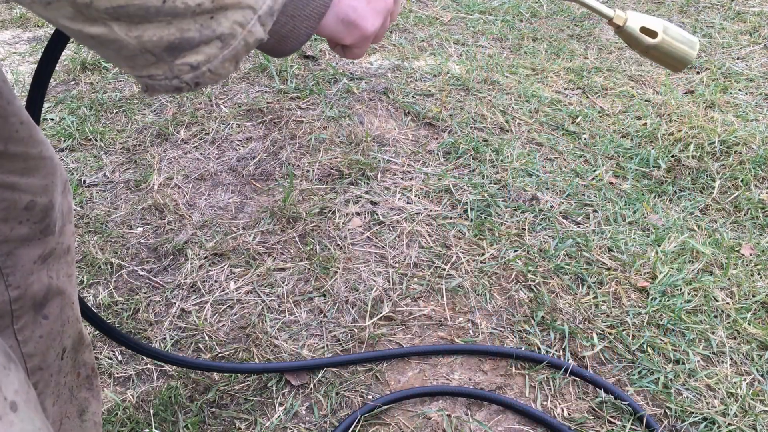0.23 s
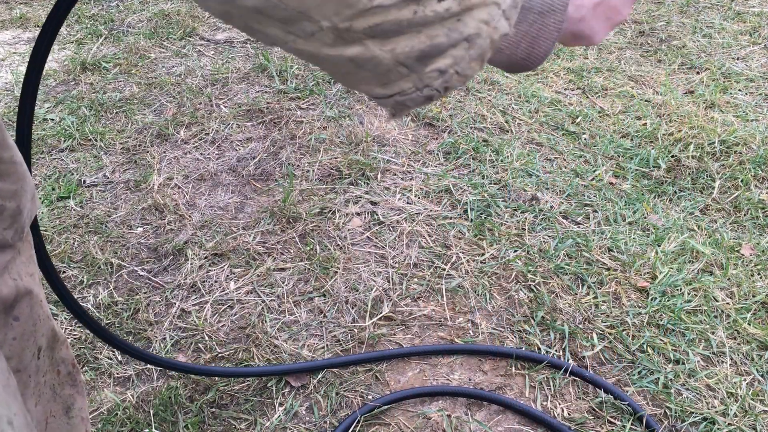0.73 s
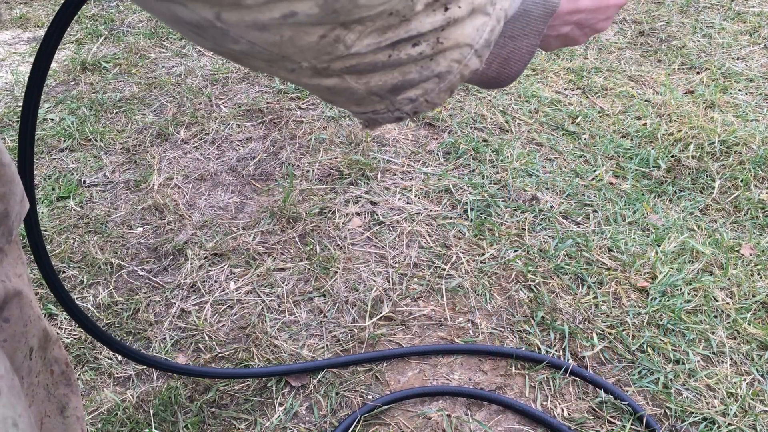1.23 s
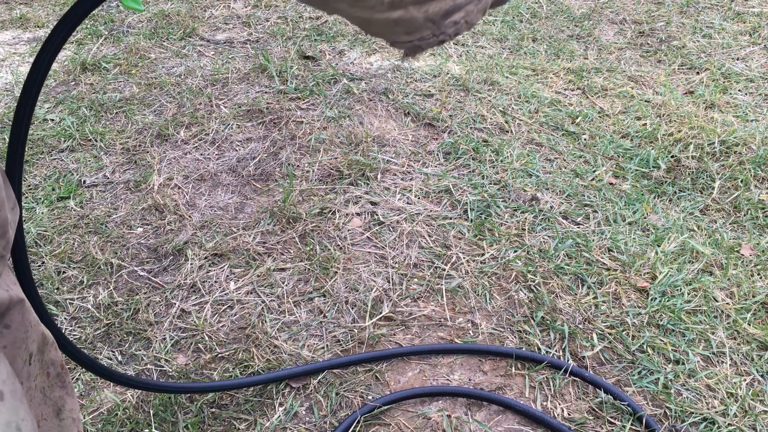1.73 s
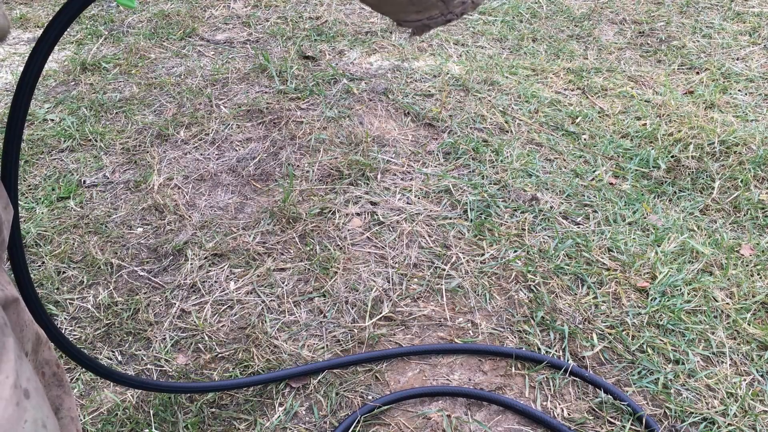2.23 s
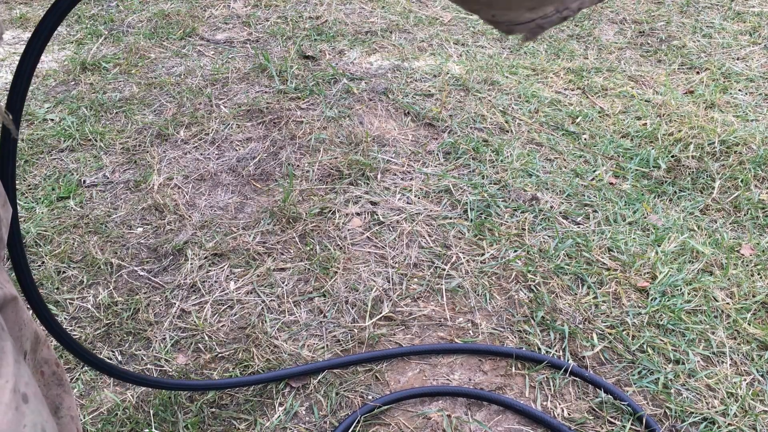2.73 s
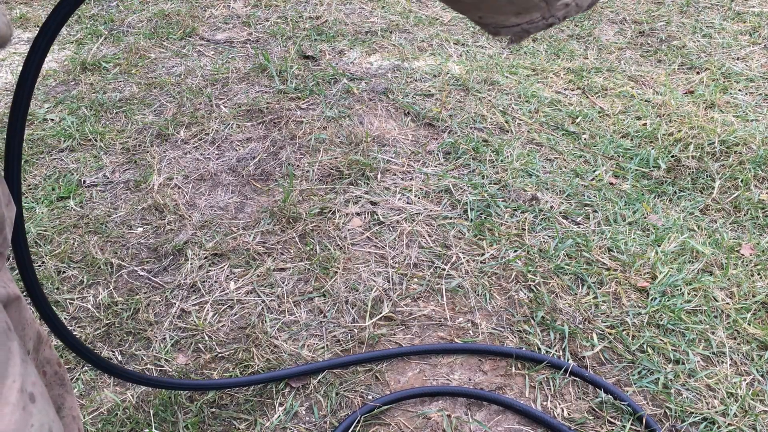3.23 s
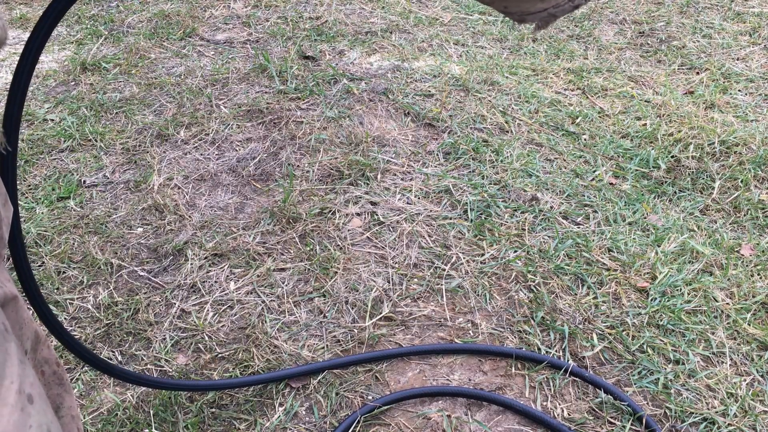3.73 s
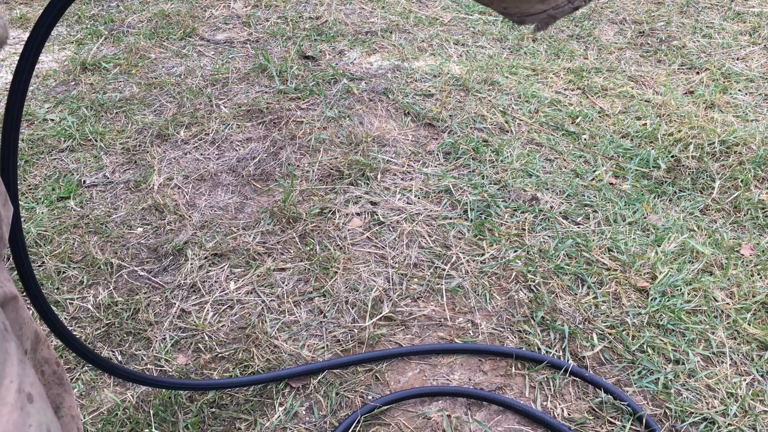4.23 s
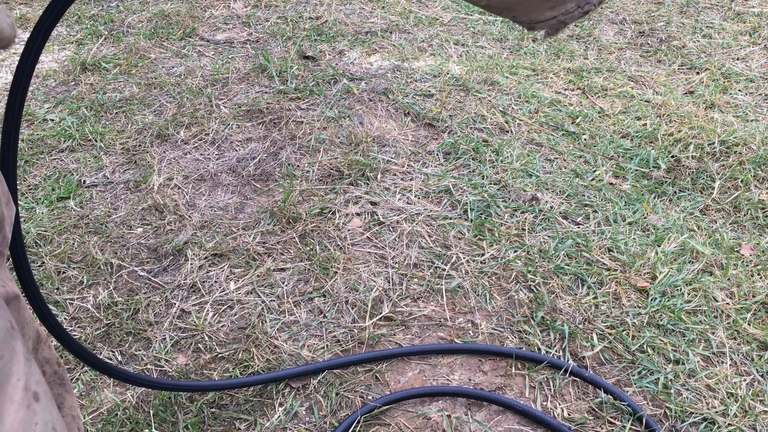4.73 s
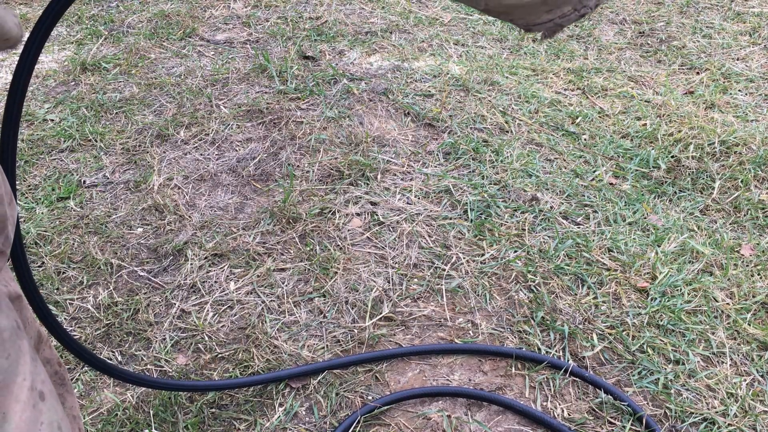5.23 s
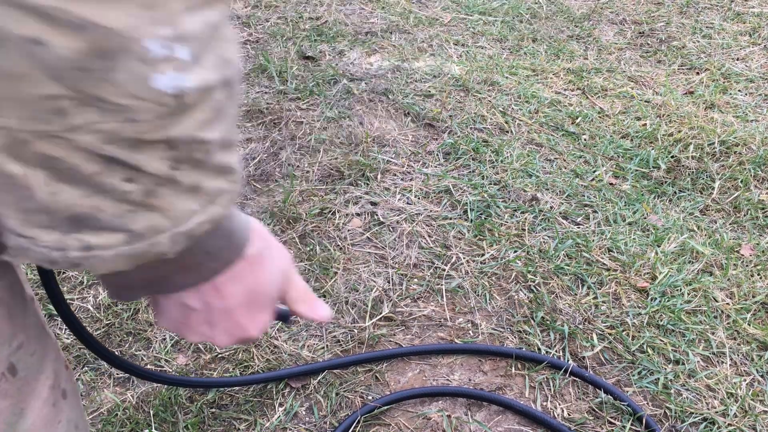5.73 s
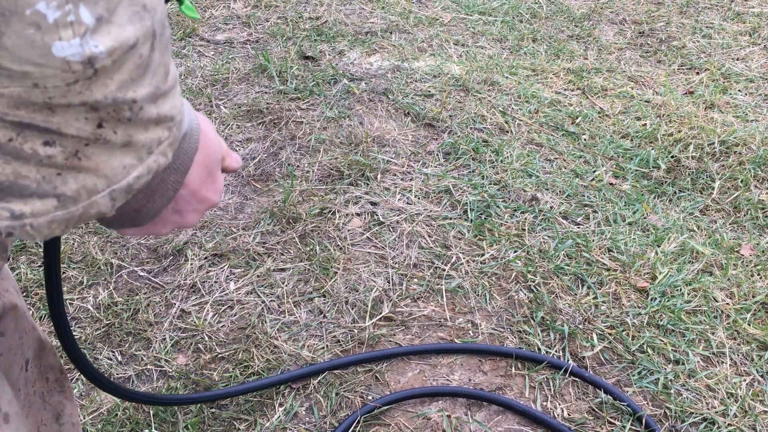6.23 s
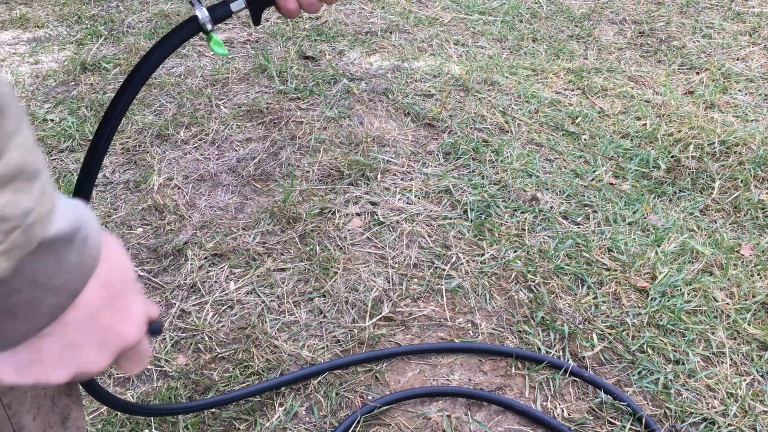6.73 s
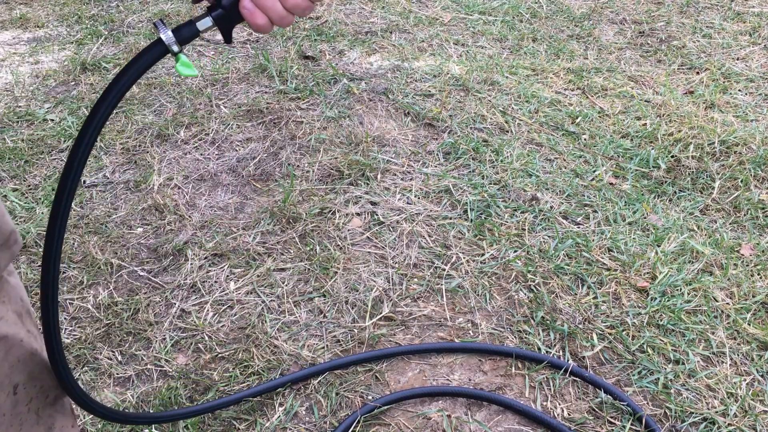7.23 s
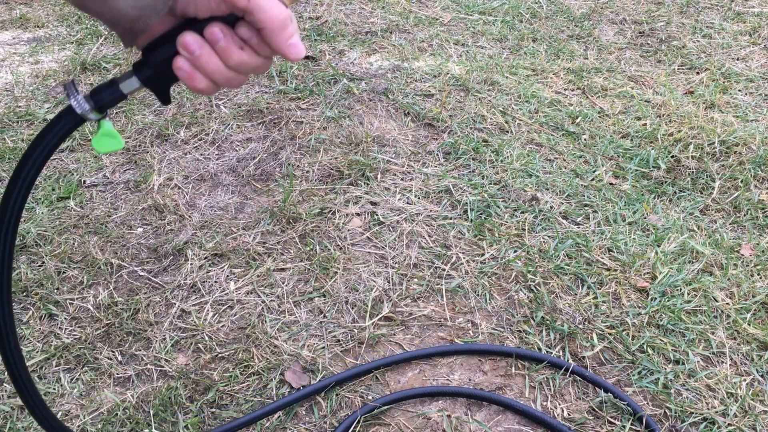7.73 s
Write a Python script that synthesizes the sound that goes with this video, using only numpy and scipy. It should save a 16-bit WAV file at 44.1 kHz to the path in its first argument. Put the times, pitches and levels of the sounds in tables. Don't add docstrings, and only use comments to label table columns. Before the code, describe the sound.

A phone about a metre from a gas torch in open air. First comes lumpy wind rumble with quiet airy hissing, the wind easing between gusts. Hard, dry igniter clicks come singly, about a second apart, with lighter release clicks between. Then a crisp snap and low pop start the flame, which flares, settles slightly and roars loudly and steadily; a brass part is knocked near the end.

```python
import sys
import numpy as np
from scipy import signal
from scipy.fft import rfft, irfft, next_fast_len
from scipy.io import wavfile
from scipy.ndimage import uniform_filter1d

SR = 44100
rng = np.random.default_rng(int(sys.argv[2]) if len(sys.argv) > 2 else 0)


def magnitude_from_level(level_db):
    exponent = np.asarray(level_db, float) / 20
    return 10 ** exponent


def wav_out(sig):
    wavfile.write(sys.argv[1], SR, np.round(np.clip(np.atleast_2d(sig).T, -1, 1) * 32767).astype(np.int16))


N = 352743
T = np.arange(N) / SR
LIT_S = 5.497
HISS_TOP_HZ = 15780


def unit(x):
    return x / np.sqrt(np.mean(x ** 2))


def curve(table, edge):
    s, *columns = np.transpose(table)
    return [np.interp(T, s, c, left=edge[0], right=edge[1]) for c in columns]


def walk(rate):
    k = int(SR / rate)
    steps = np.repeat(rng.standard_normal(N // k + 1), k)
    return 0.77 * uniform_filter1d(uniform_filter1d(steps, k), k)[:N]


def resonate(x, hz, width):
    return signal.lfilter(*signal.iirpeak(min(hz, .45 * SR), hz / max(width, 5), fs=SR), x)


def band_pass(x, low_hz, high_hz, order):
    return signal.sosfilt(signal.butter(order, [low_hz, high_hz], "band", fs=SR, output="sos"), x)


def low_pass(x, hz, order):
    return signal.sosfilt(signal.butter(order, hz, fs=SR, output="sos"), x)


def bands(points, modes, mode_db, per_octave):
    size = next_fast_len(N)
    f = np.arange(size // 2 + 1) * SR / size + 1
    hz, db = np.transpose(points)
    smooth = np.interp(np.log(f), np.log(hz), db)
    lift = 0
    for centre, width, d in modes:
        height = magnitude_from_level(d - np.interp(np.log(centre), np.log(hz), db)).clip(.3, 3)
        lift = lift + magnitude_from_level(mode_db) ** 2 * height / (1 + (2 * (f - centre) / width) ** 2)
    spectrum = rfft(rng.standard_normal(size)) * magnitude_from_level(smooth) * np.sqrt(1 + lift) * (f < HISS_TOP_HZ)
    for centre in 30 * 2 ** np.arange(0, 9.6, 1 / per_octave):
        distance = np.clip(np.log2(f / centre) * per_octave, -1, 1)
        yield centre, irfft(spectrum * np.cos(np.pi / 2 * distance) ** 2, size)[:N]


def add_swing(out, s, db, hz, cycles, sign):
    turns = np.arange(-1.5 * cycles, 4 * cycles, hz / SR)
    bell = np.exp(-(turns / cycles) ** 2 * np.where(turns < 0, 2.2, .7))
    wave = np.cos(2 * np.pi * 1.93 * (1 - np.exp(-turns / 2.034)))
    at = int((s + turns[0] / hz) * SR)
    out[at:at + len(turns)] += sign * magnitude_from_level(db) * bell * wave


# f/Hz, level/dB per Hz
FLAME_SPECTRUM = [(15, -50), (25, -22), (70, 1.5), (261, 2), (380, -1.5), (526, -12.5), (652, -8),
                  (854, -11.5), (1720, -13.5), (3200, -15), (3500, -22), (4800, -24.5), (5050, -30),
                  (15700, -30)]
# f/Hz, width/Hz, level/dB
CUP_MODES = [(770, 420, -10.5), (1075, 93, 5.5), (2817, 46, -10.5), (3160, 13, -15.5), (4550, 580, -24),
             (5330, 28, -21), (6370, 25, -20.5), (7600, 44, -29), (8740, 280, -24.5), (12100, 390, -21),
             (14500, 400, -24)]
# t/s, level/dB
BURNING = [
    (5.5, -3.5),
    (5.62, -3),
    (5.7, -0.5),
    (5.82, 4),
    (5.95, .5),
    (6.7, -1.5),
    (7.05, 1),
    (7.6, 1.5),
    (8, 2),
]
# level/dB, slope/dB per dB of burning
FLAME_LAYERS = [
    (-24.5, 0.07),
    (-27.5, 0.78),
    (-42.5, 0.4),
    (-40.5, 0.96),
]
# t/s, level/dB, f/Hz, sign
WHUMP_SWINGS = [
    (5.5035, -14, 170, 1),
    (5.5098, -11, 300, 1),
    (5.5115, -7, 240, -1),
    (5.518, -9, 130, 1),
    (5.527, -13, 60, -1),
]


def flame():
    parts, flap, lick = [0, 0, 0, 0], walk(25), walk(250)
    for hz, band in bands(FLAME_SPECTRUM, CUP_MODES, 0.78, 4):
        k = int(hz > 520) + int(hz > 3350) + int(hz > 5000)
        shared_db = (0.94, 0.73, 0.43, 0.27)[k] * flap + (1.2, 1.0, .8, 0.49)[k] * lick
        own_db = 1.2 * walk(14) + 3.55 * walk(2.207)
        parts[k] += band * magnitude_from_level(shared_db + own_db)
    burning_db, = curve(BURNING, (None, None))
    out = sum(magnitude_from_level(db + slope * burning_db) * unit(p) for (db, slope), p in zip(FLAME_LAYERS, parts))
    flash = np.exp(-np.abs(T - LIT_S) / 0.0063)
    out = out + magnitude_from_level(FLAME_LAYERS[3][0] + 14) * flash * unit(parts[3])
    out = out * np.clip((T - LIT_S) / .006, 0, 1)
    for s, db, hz, sign in WHUMP_SWINGS:
        add_swing(out, s, db, hz, .33, sign)
    return out


# f/Hz, level/dB per Hz
JET_SPECTRUM = [(150, -41), (250, -7), (870, -16), (2300, -11.5), (3140, -13.5), (3730, -4.5),
                (4830, -12.5), (5550, -9), (6960, -12), (9180, -4), (10500, -7), (14200, -2), (15700, -4)]
# f/Hz, width/Hz, level/dB
TUBE_MODES = [(2235, 280, 25), (3786, 110, -20), (5480, 51, -9.5), (6500, 73, -10.5), (7800, 150, -12.5),
              (9160, 230, -3), (11150, 120, -7), (12400, 130, 0), (13600, 380, -8), (14700, 200, -4)]
# t/s, level/dB
GAS_FLOW = [
    (0, 1),
    (1, 1.5),
    (1.56, 2),
    (1.74, -0.5),
    (2.3, -.5),
    (2.75, -1.5),
    (3.06, -4),
    (3.4, -2.5),
    (4.3, -3),
    (5.49, -3.5),
]
# level/dB, slope/dB per dB of flow
GAS_LAYERS = [
    (-65, 0.3),
    (-54.5, 1.74),
    (-57.5, 0.95),
    (-52.5, 0.85),
    (-51.5, 0.8),
]
# t/s, half length/s, level/dB above the open air
GRASS_RUSTLE = (2.78, .1, 6.2)


def gas():
    parts = [0, 0, 0, 0, 0]
    for hz, band in bands(JET_SPECTRUM, TUBE_MODES, 8.5, 4):
        k = int(hz > 1400) + int(hz > 3000) + int(hz > 7500) + int(hz > 11000)
        parts[k] += band * magnitude_from_level(0.72 * walk(9) + 2.6 * walk(1.226))
    s, half_s, rustle_db = GRASS_RUSTLE
    parts[0] = unit(parts[0]) * magnitude_from_level(rustle_db * np.exp(-((T - s) / half_s) ** 2))
    flow_db, = curve(GAS_FLOW, (None, -40))
    out = sum(magnitude_from_level(db + slope * flow_db) * unit(p) for (db, slope), p in zip(GAS_LAYERS, parts))
    return out * (T < LIT_S)


# t/s, extra delay/ms, strength/0-1
GROUND_PATH = [
    (0, 2.4, .2),
    (1.2, 2.9, .2),
    (5.4, 3.27, .3),
    (5.9, 3.2, .2),
    (6.06, 3.14, .45),
    (6.6, 3.07, .45),
    (7.3, 3.2, .18),
    (7.7, 3.45, .15),
    (8, 3.55, .27),
]


def ground(x):
    delay_ms, strength = curve(GROUND_PATH, (None, None))
    dull = signal.sosfiltfilt(signal.butter(2, [700, 5500], "band", fs=SR, output="sos"), x)
    return x + strength * np.interp(T - delay_ms / 1000, T, dull)


# t/s, peak level/dB, body above spring/dB, ground echo level/dB, ground echo delay/ms
SNAP_EVENTS = [
    (2.342, -2, 8.5, -11, 4),
    (2.5306, -13, 4, -9, 3.8),
    (3.2009, -1.5, 10.5, -14, 3.5),
    (3.3931, -19.5, 5.5, -10, 3.5),
    (4.096, -3.5, 13, -8, 2.8),
    (4.7155, -19.5, 2, -1, 4.1),
    (5.4933, -3, 13, -13, 3.8),
]
# f/Hz, width/Hz, level/dB
IGNITER_MODES = [(2460, 1250, -2), (3750, 820, -8.5), (4800, 1170, 4), (6080, 200, 0.5), (6620, 1050, 8),
                 (9530, 1800, 5.5), (12260, 1900, 4.5), (14150, 1800, 1), (14800, 1000, -8)]


def igniter():
    t = T[:int(.12 * SR)]
    out = np.zeros(N + len(t))
    for s, db, body_db, ground_echo_db, ground_echo_ms in SNAP_EVENTS:
        blow = 0.5 * np.exp(-t / 0.00028) + np.exp(-t / 0.0016)
        blow = blow + magnitude_from_level(ground_echo_db) * np.exp(-((t - ground_echo_ms / 1000) / .0008) ** 2)
        echo = magnitude_from_level(-25) * np.exp(-((t - .017) / 0.0085) ** 2)
        echo = echo + magnitude_from_level(-32) * np.exp(-((t - .036) / 0.0042) ** 2)
        echo = echo + magnitude_from_level(-37.0) * (t > .051) * np.exp(-((t - .051) / 0.027) ** 2)
        echo = echo + magnitude_from_level(-22) * np.exp(-t / 0.0047) + magnitude_from_level(-31) * np.exp(-t / 0.041)
        noise = rng.standard_normal(len(t))
        noise[0] = 3.84
        top_cut = signal.ellip(8, .5, 60, HISS_TOP_HZ, fs=SR, output="sos")
        noise = noise * blow + signal.sosfilt(top_cut, noise * echo)
        snap = 0
        for hz, width, mode_db in IGNITER_MODES:
            ring = resonate(resonate(noise, hz, 0.9 * width), hz, 0.9 * width)
            part_db = body_db if hz < 3500 else 0 if hz < 8000 else 2.5
            snap = snap + magnitude_from_level(mode_db + part_db) * unit(ring)
        snap = band_pass(snap, 1650, 16300, 4)
        at = int(s * SR)
        out[at:at + len(t)] += magnitude_from_level(db - 1.5) * snap / np.abs(snap).max()
    return out[:N]


# f/Hz, level/dB, time to fall 60 dB/s
BRASS_MODES = [(3688, -14, 0.2), (5912, 2, 0.17), (10720, -14, 0.1), (11750, -19, 0.08)]
# t/s, peak level/dB
BRASS_KNOCK = [
    (7.5152, -17),
]


def fitting():
    (s, db), = BRASS_KNOCK
    t = np.clip(T - s, 0, None)
    ring = 0
    for hz, mode_db, t60 in BRASS_MODES:
        ring = ring + magnitude_from_level(mode_db) * np.sin(2 * np.pi * hz * t) * np.exp(-np.log(1000) * t / t60)
    crack = resonate(rng.standard_normal(N), 9800, 7000) * np.exp(-t / 0.0015) * (t > 0)
    return magnitude_from_level(db) * (magnitude_from_level(-1.5) * ring + magnitude_from_level(4) * crack)


# t/s, level/dB, f/Hz, half length/s
FAINT_TONE = (7.054, -43, 5230, .009)


def thin_tone():
    s, db, hz, half_s = FAINT_TONE
    return magnitude_from_level(db) * np.exp(-((T - s) / half_s) ** 2) * np.sin(2 * np.pi * hz * T)


# start t/s, hold/s, buffet level/dB
WIND_GUSTS = [(0, 0.012, -32.5), (0.086, 0.037, -45), (.2, 0.017, -38.5), (0.372, 0.043, -29),
              (0.513, 0.34, -31.5), (0.832, 0.035, -26), (0.905, 0.27, -30), (1.22, 0.28, -31.5),
              (1.559, 0.071, -22), (1.67, 0.17, -30), (1.896, 0.058, -34.5), (2.11, 0.068, -38.5),
              (2.215, 0.037, -45), (2.415, 0.013, -38), (2.547, 0.19, -53), (2.822, 0.15, -42.5),
              (3.057, .06, -42), (3.16, 0.022, -32.5), (3.316, 0.11, -35), (3.426, 0.072, -30),
              (3.56, 0.042, -40), (3.775, 0.12, -33), (4.055, 0.035, -36.5), (4.214, 0.09, -30),
              (4.324, 0.12, -29.5), (4.513, 0.03, -35), (4.846, 0.018, -43.5), (5.085, 0.043, -53),
              (5.424, 0.075, -53)]


def gusts():
    rise_db_s, fall_db_s, calm_db = 264, 175, -58.5
    level = np.full(N, calm_db)
    for s, hold, db in WIND_GUSTS:
        rise = rise_db_s * np.clip(s - T, 0, None)
        fall = fall_db_s * np.clip(T - s - hold, 0, None)
        level = np.maximum(level, db - rise - fall)
    return level


# t/s, peak level/dB, f/Hz
STRONG_EDDIES = [(0.39, -12, 340), (0.423, -25, 246), (0.542, -21, 210), (0.566, -18.5, 215),
                 (0.722, -23, 188), (0.799, -22, 238), (0.844, -17, 224), (1.002, -15, 200),
                 (1.124, -25, 240), (1.201, -22.5, 303), (1.221, -16, 232), (1.238, -19.5, 205),
                 (1.479, -23.5, 240), (1.567, -21, 197), (1.597, -18, 303), (1.697, -21, 257),
                 (1.751, -23, 316), (1.824, -24.5, 257), (1.96, -20.5, 240), (2.11, -30, 282),
                 (3.132, -21.5, 215), (3.18, -22, 185), (3.76, -23.5, 186), (3.858, -22.5, 272),
                 (3.907, -26, 224), (4.291, -17.5, 310), (4.343, -21, 268), (4.402, -19.5, 206),
                 (4.465, -17, 264), (4.517, -32, 196)]


def wind():
    buffet_db = gusts()
    low = resonate(resonate(rng.standard_normal(N), 62, 64), 64, 87) * magnitude_from_level(6.7 * walk(27.884))
    low = unit(low_pass(low, 210, 4))
    flutter = resonate(rng.standard_normal(N), 165, 170) * magnitude_from_level(3.7 * walk(55))
    flutter = unit(low_pass(flutter, 300, 3))
    out = magnitude_from_level(buffet_db + 0.5) * low + magnitude_from_level(-44.5 + 1.43 * (buffet_db + 28.5)) * flutter
    when, size, pitch = rng.random((220, 3)).T
    when = .05 + (LIT_S - .1) * when
    small_db = -33.5 + 1.36 * (np.interp(when, T, buffet_db) + 29)
    small_db = small_db - 3.5 * np.log(1 - size).clip(-2, 0)
    puffs = list(STRONG_EDDIES)
    for s, db, hz in STRONG_EDDIES:
        for a, b, c in rng.random((3, 3)):
            puffs.append((s + .055 * (a - .45), db - 5 - 8 * b, hz * (0.65 + 0.42 * c)))
    puffs += list(zip(when, small_db, 182 * (0.81 + .35 * pitch)))
    for s, db, hz in puffs:
        side, length, lead = rng.random(3)
        add_swing(out, s, db + 1.0, 0.9 * hz, 0.35 + .5 * length, np.sign(side - .5))
        beside_s = s + 0.00838 * (lead - .5)
        add_swing(out, beside_s, db - 13.5, (1.254 + 0.84 * side) * hz, 1.7, np.sign(lead - .5))
    return low_pass(out, 720, 3)


def scene():
    return (wind() + ground(gas() + flame()) + igniter() + fitting() + thin_tone())[None]


# centre t/s, share of weak lines lost/0-1
THIN_MOMENTS = [(.905, .8), (1.694, .9), (1.762, .9), (2.185, .8), (2.293, .85), (2.654, .9), (2.953, .85),
                (3.272, .85), (3.358, .85), (3.572, .8), (3.725, .95), (4.34, .9), (4.81, .85), (5.663, .9),
                (5.684, .7), (6.004, .8), (6.09, .75), (6.174, .8), (6.497, .85), (6.773, .75), (6.92, .8),
                (7.048, .75), (7.285, .85), (7.454, .8), (7.626, .75), (7.669, .8), (7.817, .8),
                (7.901, .75)]


def thin_out(x):
    out, size = x.copy(), 1300
    window = np.sin(np.pi * (np.arange(size) + .5) / size)
    hz = np.arange(size // 2 + 1) * SR / size
    for s, share in THIN_MOMENTS:
        at = int(s * SR) - size // 2
        lines = rfft(out[at:at + size] * window)
        power = np.abs(lines) ** 2
        kept = power > 4.6 * uniform_filter1d(power, size=41)
        poor = np.clip(hz / (1500 if s > LIT_S else 700) - 1, 0, .4) / .4
        loss = np.where(kept, -.6, min(share + 0.058, 1))
        out[at:at + size] -= window * irfft(lines * poor * loss, size)
    return out


def band_limit(x):
    return signal.sosfilt(signal.butter(12, 17020, fs=SR, output="sos"), x)


def record(dry):
    flat = signal.sosfilt(signal.butter(2, 41, "high", fs=SR, output="sos"), dry[0])
    mix = thin_out(flat)[None]
    return band_limit(mix)


dry = scene()
out = record(dry)
wav_out(out)
```